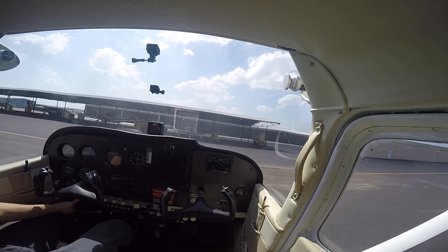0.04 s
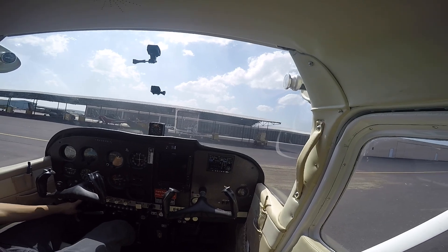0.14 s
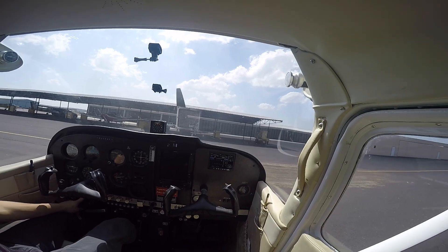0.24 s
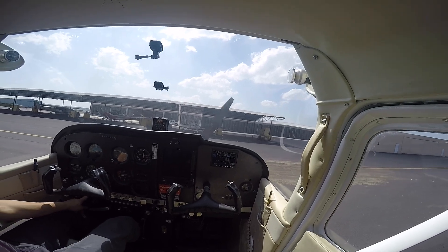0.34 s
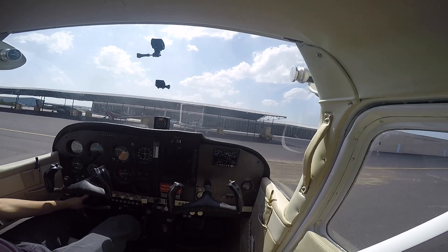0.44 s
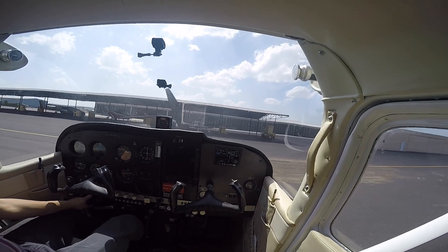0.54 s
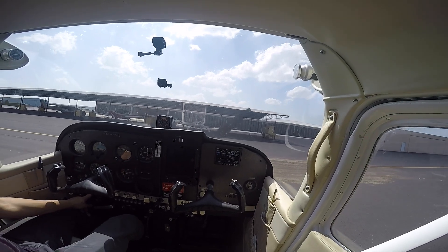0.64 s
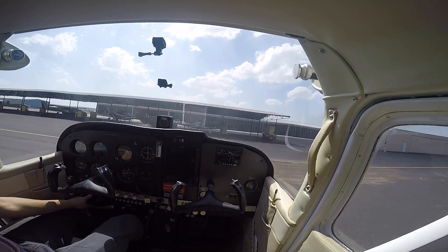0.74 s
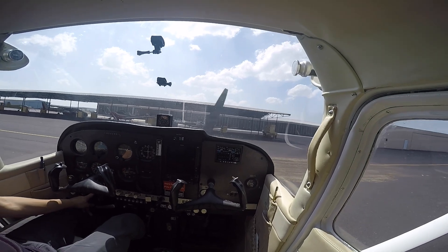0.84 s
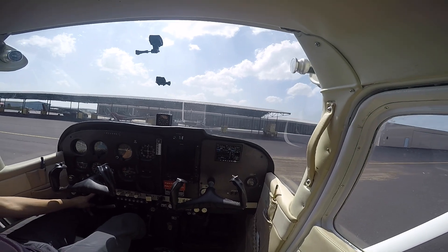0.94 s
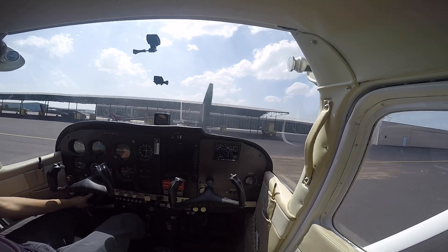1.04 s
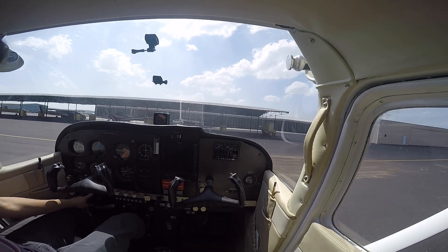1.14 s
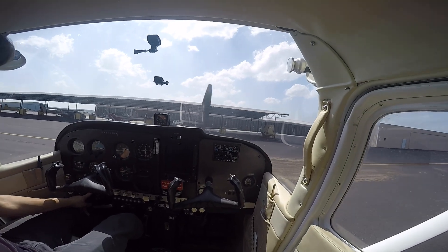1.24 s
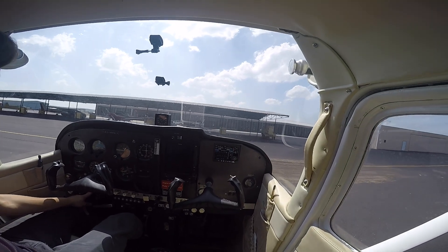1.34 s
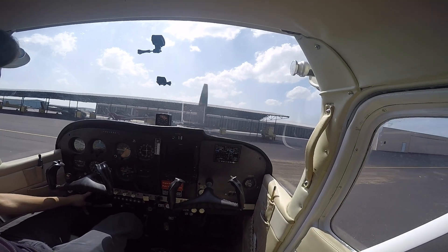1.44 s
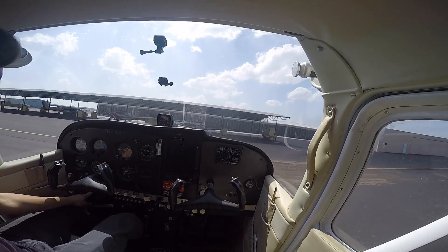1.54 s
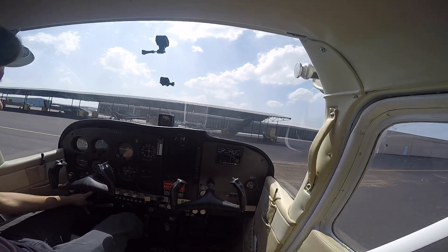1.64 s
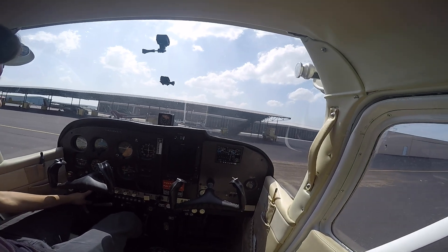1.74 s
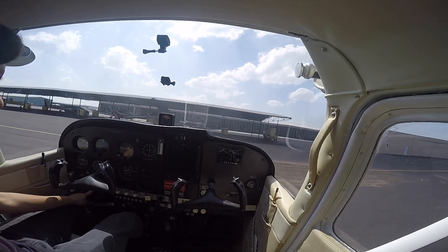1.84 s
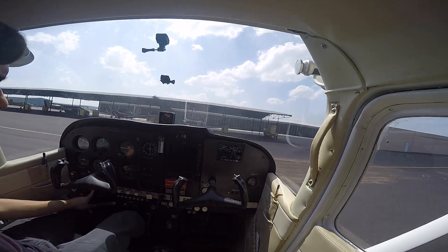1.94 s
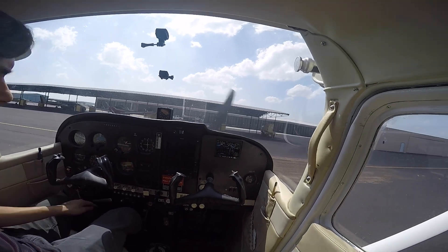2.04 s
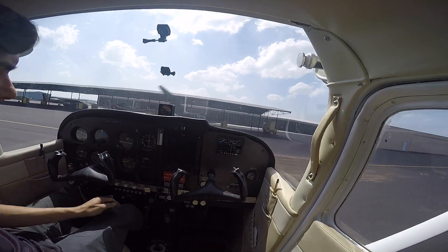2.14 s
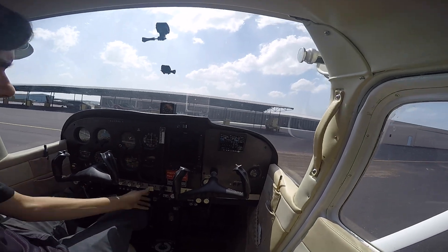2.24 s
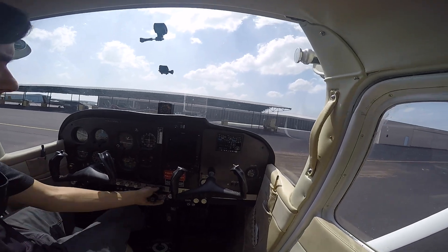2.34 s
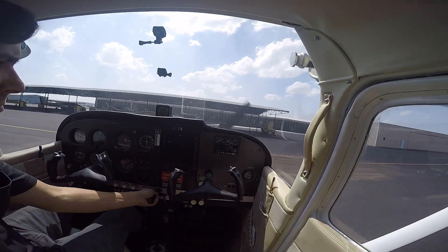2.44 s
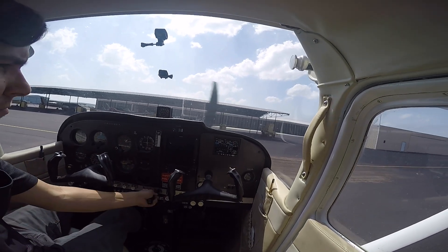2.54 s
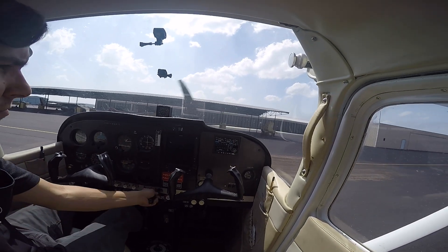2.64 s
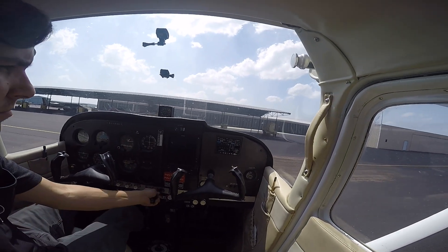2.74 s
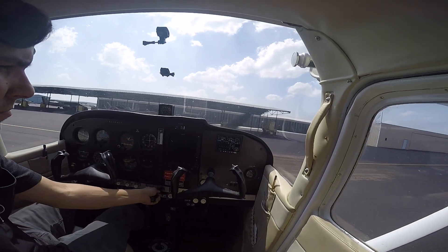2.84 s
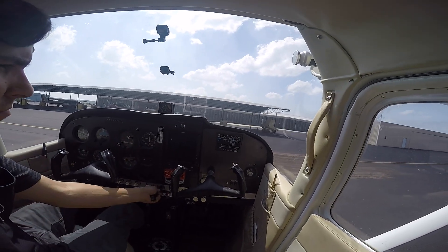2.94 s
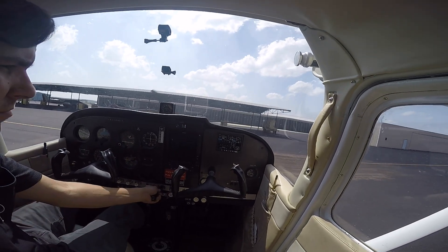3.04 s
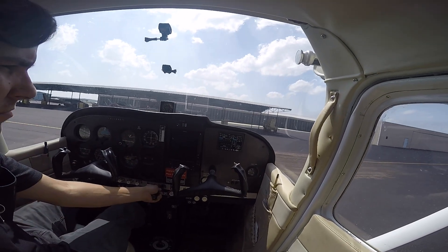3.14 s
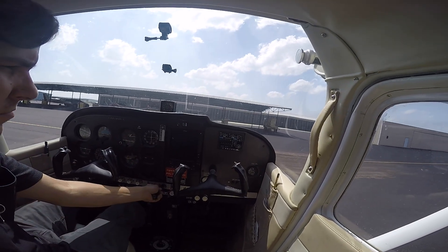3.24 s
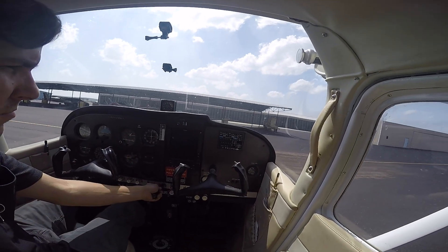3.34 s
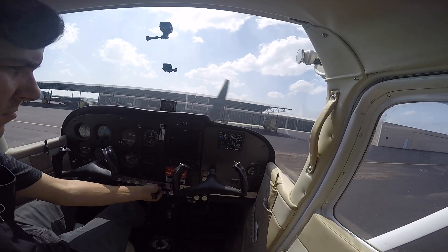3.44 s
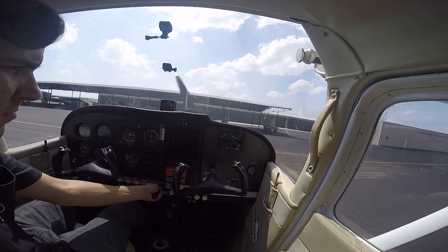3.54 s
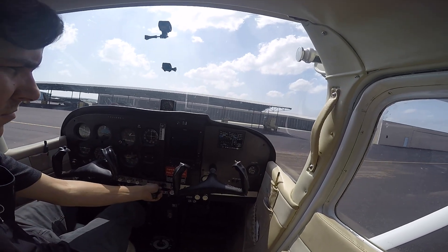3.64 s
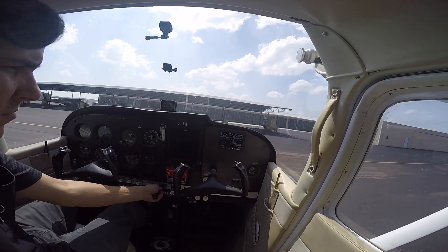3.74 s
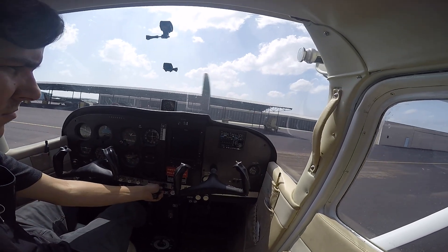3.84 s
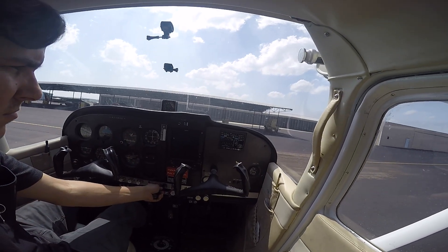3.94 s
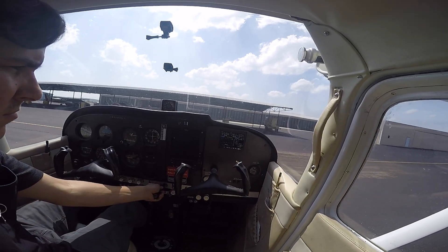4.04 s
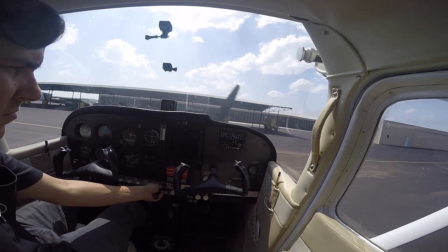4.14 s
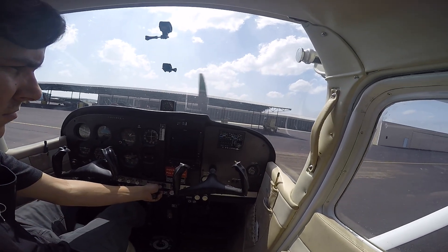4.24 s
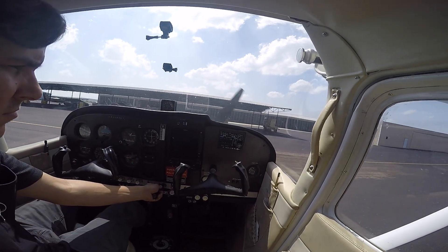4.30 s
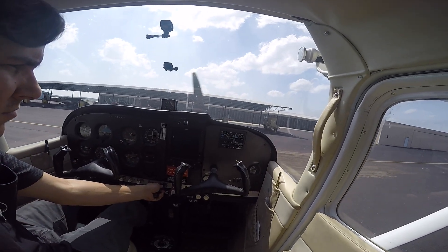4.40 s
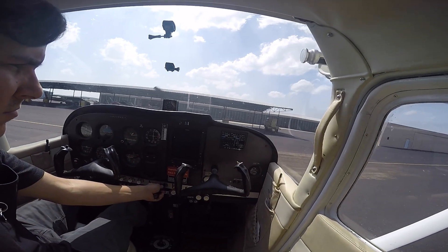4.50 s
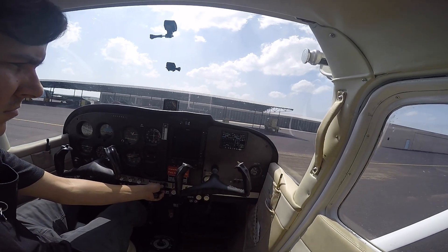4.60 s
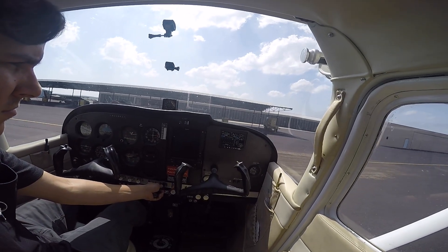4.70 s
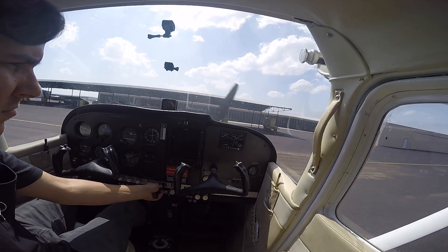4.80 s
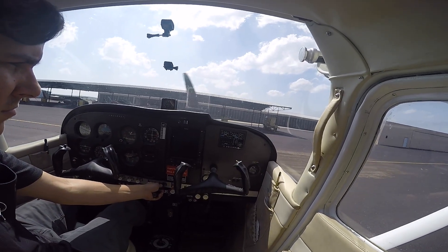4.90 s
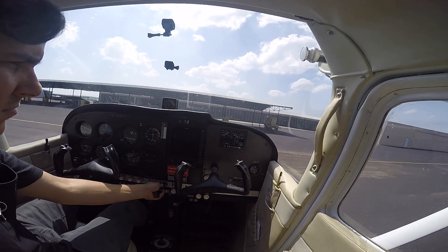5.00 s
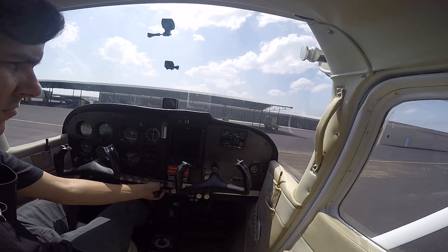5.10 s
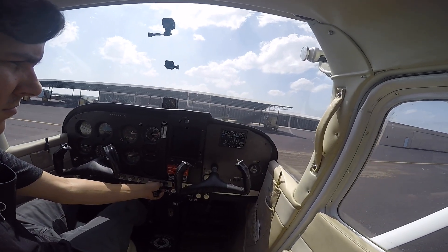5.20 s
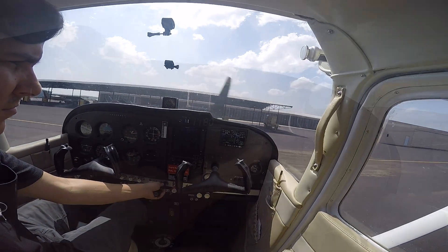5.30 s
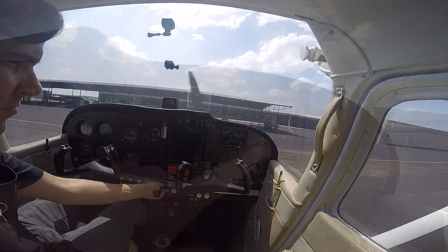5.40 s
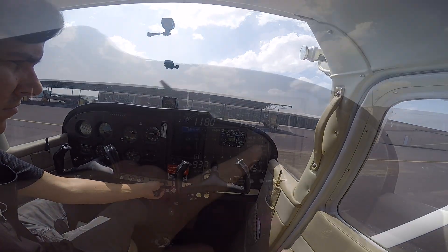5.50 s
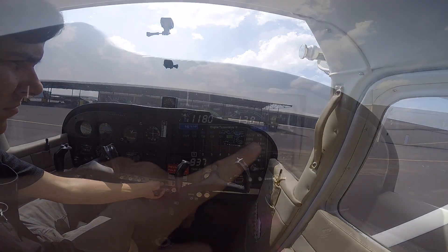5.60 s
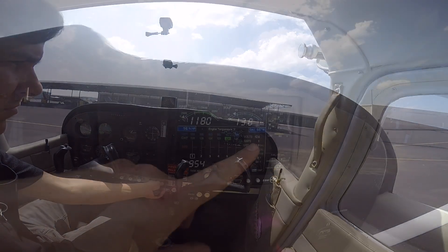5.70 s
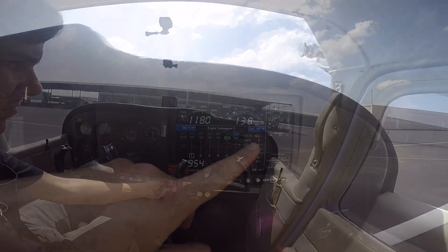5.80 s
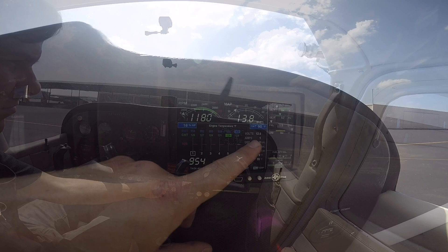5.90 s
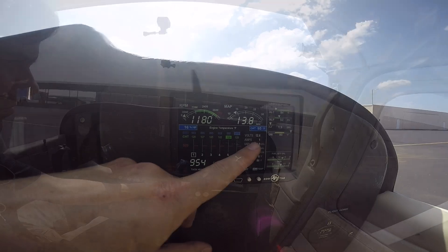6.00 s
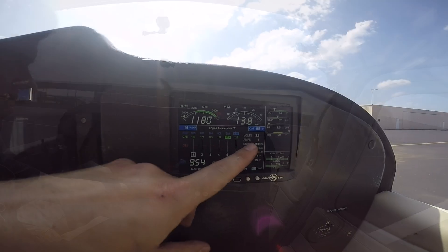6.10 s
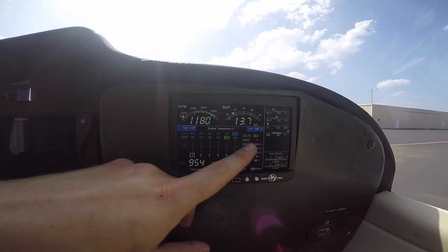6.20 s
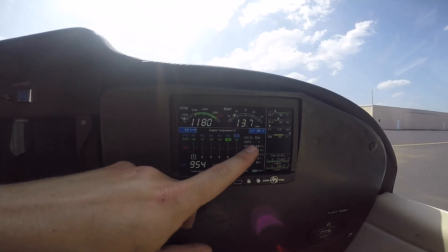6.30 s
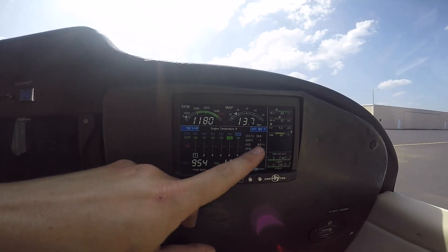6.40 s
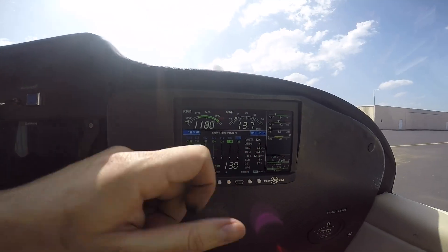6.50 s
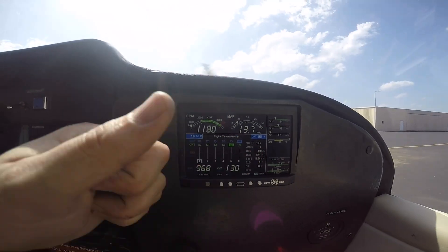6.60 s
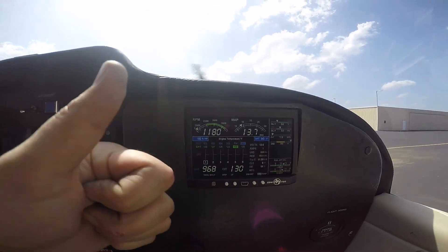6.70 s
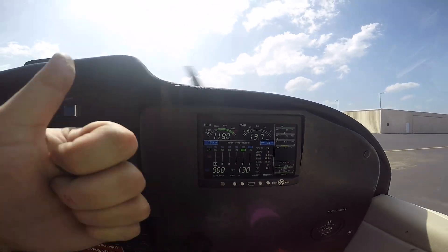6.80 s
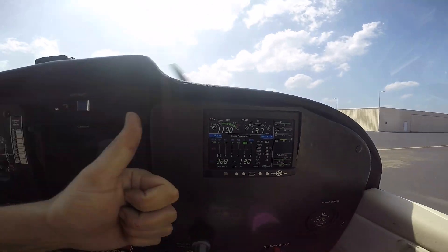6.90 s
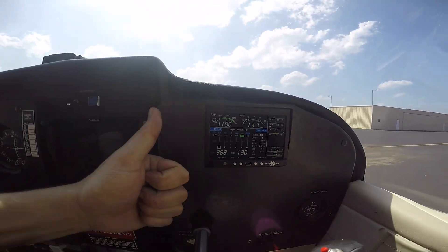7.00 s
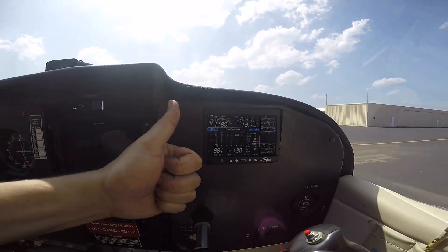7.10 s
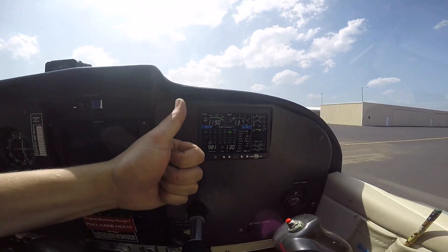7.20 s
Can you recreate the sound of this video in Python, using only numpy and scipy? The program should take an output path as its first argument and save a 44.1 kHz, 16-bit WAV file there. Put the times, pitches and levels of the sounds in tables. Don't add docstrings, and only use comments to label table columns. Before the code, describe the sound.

Inside a small aircraft cabin, small ticks and a gear clunk come first, then a run of hard, rattling compression knocks with short air hisses. After a brief gap the engine fires in sharp blasts, catches with a deep boom and races, then drops to a lumpy, puffing idle with jingling metal. Finally it crossfades to a smoother, quicker warm idle, close to the microphone.

```python
import sys
import numpy as np
from scipy import signal
from scipy.fft import rfft, irfft, next_fast_len
from scipy.io import wavfile
from scipy.ndimage import uniform_filter1d, map_coordinates

SR = 44100
rng = np.random.default_rng(int(sys.argv[2]) if len(sys.argv) > 2 else 0)


def gain_from_decibels(decibels):
    exponent = np.asarray(decibels, float) / 20
    return 10 ** exponent


def unload_wav(signal):
    wavfile.write(
        sys.argv[1],
        SR,
        np.round(np.clip(np.atleast_2d(signal).T, -1, 1) * 32767).astype(np.int16),
    )


N = 319801
T = np.arange(N) / SR

# t/s, rate/(turns per s)
SPEED = [(1.8906, 12.11), (2.0, 18.64), (2.35, 21.58), (2.7, 20.75), (3.0, 16.87), (3.2, 13.79),
         (3.77, 12.95), (3.9, 11.17), (4.02, 13.45), (4.5, 13.37), (6.0, 13.82)]
# t/s, puff
# peak level/dB, thump level/dB
BURN = [(1.89, -16.5, -0.5), (1.97, -23.5, -17), (2.15, -25, -18.5), (2.33, -26.5, -12.5),
        (2.66, -25, -13.5), (2.85, -37.5, -14.5), (3.08, -41, -13.5), (3.25, -31, -16.5),
        (3.36, -22, -16.5), (4.3, -24.5, -17.5), (5.2, -22.5, -15.5), (5.5, -26, -17.5), (5.61, -27.5, -30),
        (5.7, -29, -18), (5.98, -40.5, -26)]
# t/s, level re trend/dB
ODD_BURNS = [(2.17, -1.5), (2.55, 0.5), (2.6, -1), (2.64, 1), (2.955, 0), (3.14, 11.5), (4.13, 4),
             (4.43, -2.5), (4.87, 2), (5.03, -3.5), (5.25, -3.5), (5.68, -9.5)]
LEAN_TURNS, LEAN_DB = 3, -2.5
SCATTER_DB, THUMP_SCATTER_DB = 1.0, 1.5
FASTENERS_HZ = [3580, 3890, 5460, 5900, 6200, 6550, 6730, 7640]
# shaft multiple, level/dB
COLD_ORDERS = [(1, -9), (2, -3), (3, -10.5), (4, 0), (5, -9), (6, -1), (7, -19.5), (8, -0.5), (9, -8),
               (10, -0.5)]
# f/Hz, width/Hz, level/dB
CABIN = [(24.4, 18.2, -2.5), (52.4, 17, 1.5), (115, 46, -17.5), (197, 39, -37)]
# f/Hz, level/dB per Hz
RUMBLE = [(12, -56), (20, 9), (64, -6), (91, -34), (113, -26), (216, -27), (300, -51), (390, -77),
          (660, -120)]
# f/Hz, level/dB per Hz
PUFF = [(1180, -32), (2000, -30), (2180, -16), (3680, -9.5), (5390, -5), (11400, -7.5), (15200, -17),
        (15600, -18), (16000, -39)]

# t/s, panel peak level/dB, hiss re panel/dB, thump level/dB, length/s
ENGAGE = [
    (0.034, -51, 10, -34, 0.037),
    (0.106, -48, 7, -41, 0.0091),
    (0.199, -25.5, -35.5, -17, 0.028),
    (0.553, -27.5, -30, -38, 0.014),
    (1.355, -24, -58, -13.5, 0.019),
]
# t/s, panel peak level/dB, thump level/dB
SQUEEZES = [
    (0.376, -14.5, -22),
    (0.578, -13.5, -27),
    (0.744, -15.5, -30),
    (0.894, -15, -40),
    (1.036, -15, -22),
    (1.176, -14, -17.5),
    (1.445, -14.5, -13.5),
]
SQUEEZE_S, SQUEEZE_HISS_DB = 0.026, -16.5
REBOUND_AFTER_S, REBOUND_DB, REBOUND_THUMP_DB, REBOUND_S = 0.0602, -14.5, -2, 0.02
# t/s, blast peak level/dB, panel re blast/dB, thump level/dB, length/s
CATCH = [
    (1.597, -20.5, 0.5, -15, 0.023),
    (1.678, -11, -2.5, -24, 0.012),
    (1.749, -9.5, -0.5, -13.5, 0.013),
    (1.8044, -6.5, -5.5, -7, 0.0075),
    (1.844, -14, -7, -27, 0.032),
    (1.927, -19.5, -28, -27, 0.056),
]
# f/Hz, level/dB per Hz
SNEEZE = [(1180, 0.5), (2000, -5), (3140, -7), (4900, -7), (5730, -13.5), (7910, -6), (9830, -21),
          (14500, -24), (15500, -30), (16000, -50)]
# f/Hz, level/dB per Hz
BLAST = [(710, -28), (1200, -3), (1980, -1.5), (2140, -4.5), (3430, -5), (3940, -6.5), (8330, -3.5),
         (8980, -9), (15500, -15.5)]
# f/Hz, width/Hz, level/dB
PANEL = [(799, 40, 1.5), (1118, 28, 0.5), (1595, 4.9, -8), (1740, 48, -9.5), (2450, 31, -42),
         (2840, 40, -21)]
# f/Hz, level/dB per Hz
CLATTER = [(88, -45), (150, -24), (218, 4), (281, -7), (675, -5), (805, -7), (1280, -7.5), (3000, -19),
           (3900, -48), (6600, -120)]
# f/Hz, width/Hz, level/dB
FRAME = [(36.4, 18.3, 0.5), (54.6, 16, 1), (70.4, 4.4, -8), (120, 29, -18.5), (207, 69, -22)]
# t/s, level/dB
SHAKE = [(0.0, -56), (0.13, -37.5), (0.3, -40), (0.44, -35), (1.45, -35), (1.67, -26), (1.93, -25.5),
         (2.12, -32), (2.7, -30), (4.3, -33.5), (5.07, -30.5), (5.77, -35), (6.3, -32)]
RUMBLE_DB, RUMBLE_GROWS = 12, 0.57

WARM_SHAFT_HZ = 19.76
# t/s, level/dB
WARM = [
    (5.45, -31),
    (5.76, -33),
    (6.3, -28.5),
    (7.25, -28.5),
]
# shaft multiple, level/dB
WARM_ORDERS = [(1, -22), (2, -7), (3, 0), (4, -14), (5, -19), (6, -11), (7, -27), (8, -32), (10, -22),
               (12, -24)]
# f/Hz, width/Hz, level/dB
DASH = [(548, 35, 3), (771, 35, 0.5), (863, 57.5, 1), (1182, 71, -7), (1317, 15.4, -1.5), (1600, 36, -19)]
# f/Hz, level/dB per Hz
ROAR = [(13, -35), (22, 1), (68, -17.5), (135, -15), (163, -22), (438, -23), (530, -40), (661, -27),
        (846, -20.5), (1020, -30), (1310, -26.5), (2030, -37.5), (3820, -52), (8020, -48.5), (15500, -68)]

# t/s, f/Hz, level/dB, t60/s
ROCK = [
    (0.097, 20.8, -11.5, 3),
    (0.97, 18, -12.5, 0.4),
    (1.19, 15.5, -15, 3.5),
    (1.609, 14.9, -2.5, 0.46),
    (1.834, 19, -4, 0.44),
]
ROCK_RISE_S = 0.022
# t/s, level/dB
LEAK = [
    (1.8, -40),
    (1.842, -49),
    (1.916, -35),
    (2.232, -42),
    (2.582, -41),
    (2.644, -39.5),
    (2.77, -42),
    (2.85, -51),
]
# f/Hz, width/Hz, level/dB
LEAK_MODE = [(6860, 920, 0)]
# t/s, peak level/dB
CLICKS = [(0.0625, -23), (0.113, -17), (0.153, -27), (0.191, -33), (0.245, -41), (0.845, -22.5),
          (1.572, -21), (1.607, -11), (1.8445, -0.5), (2.7826, -8.5), (3.1108, -23), (3.1964, -30),
          (6.9424, -20)]
# f/Hz, level/dB per Hz
BUZZ = [(88, 5.5), (150, 1.5), (162, -8.5), (218, -6), (326, -8.5), (414, -6), (581, -10), (795, -10.5),
        (878, -8), (1090, -10.5), (1930, -17.5), (2190, -23.5), (3000, -24), (3900, -29), (6600, -120)]
# f/Hz, level/dB per Hz
AIR = [(1180, -3), (2000, 0.5), (2340, -4), (3200, -1), (3580, -2), (6820, 0), (14500, -14), (15600, -20),
       (16000, -43)]
LINGER_DB, LINGER_S = -34.5, 0.14
HISS_FLOOR_DB, HISS_DB, HISS_GROWS = -65.5, -40, 0.49
TOP_HZ = 15550


def unit(x):
    return x / np.sqrt(np.mean(x ** 2) + 1e-20)


def curves(rows):
    s, *cols = np.transpose(rows)
    return [np.interp(T, s, c) for c in cols]


def fade_in(start_s, length_s):
    return np.clip((T - start_s) / length_s, 0, 1)


def fade_out(end_s, length_s):
    return np.clip((end_s - T) / length_s, 0, 1)


def wobble(rate_hz):
    coarse = T[::32]
    knots = rng.standard_normal(int(N * rate_hz / SR) + 4)
    return np.interp(T, coarse, map_coordinates(knots, [coarse * rate_hz]))


def filtered(x, response):
    m = next_fast_len(N + SR // 2)
    return irfft(rfft(x, m) * response(np.fft.rfftfreq(m, 1 / SR)), m)[:N]


def shaped(points):
    f, db = np.transpose(points)
    return lambda hz: gain_from_decibels(np.interp(np.log(hz + 1), np.log(f + 1), db))


def modes(rows):
    def response(f):
        total = 0
        for k, (centre, width, db) in enumerate(rows):
            damping = 1j * f * width
            total = total + (-1) ** k * gain_from_decibels(db) * damping / (centre * centre - f * f + damping)
        return total
    return response


def noise(response, patchy_db):
    z = signal.stft(rng.standard_normal(N), nperseg=256)[2]
    field = uniform_filter1d(rng.standard_normal(z.shape), 4, 0)
    field = unit(uniform_filter1d(field, 8, 1))
    patchy = signal.istft(z * gain_from_decibels(patchy_db * field), nperseg=256)[1][:N]
    return unit(filtered(patchy, response))


def blows(s, gain):
    at = np.round(np.asarray(s) * SR).astype(int)
    return np.bincount(at[at < N], np.asarray(gain)[at < N], N)


def burst(length, rise, tail):
    t = np.arange(SR // 5) / SR
    return (1 - np.exp(-t / rise)) * np.exp(-np.maximum(t - abs(length), 0) / tail)


def cabin(pushes):
    ring = irfft(modes(CABIN)(np.fft.rfftfreq(SR, 1 / SR)))[:SR // 2]
    ring = np.convolve(ring, np.hanning(SR // 150))
    return signal.oaconvolve(pushes, ring / np.abs(ring).max())[:N]


def firings():
    hz, = curves(SPEED)
    turns = np.cumsum(hz * (T >= SPEED[0][0])) / SR
    s = np.interp(np.arange(63), turns + T / N, T)
    s[0] = SPEED[0][0]
    when, puff_db, thump_db = np.transpose(BURN)
    chance = rng.standard_normal((len(s), 3))
    lean = np.arange(len(s)) % LEAN_TURNS == 2
    puff_db = np.interp(s, when, puff_db) + LEAN_DB * lean + SCATTER_DB * chance[:, 0]
    for at, db in ODD_BURNS:
        puff_db[np.argmin(np.abs(s - at))] += db
    thump_db = np.interp(s, when, thump_db) + THUMP_SCATTER_DB * chance[:, 1]
    return s + .0015 * chance[:, 2], puff_db, thump_db, rng.choice(FASTENERS_HZ, len(s))


def cold_boom(firing):
    s, puff_db, thump_db, _ = firing
    padded = np.pad(s, 2, mode="reflect", reflect_type="odd")
    steady = uniform_filter1d(padded, size=3)[2:-2]
    slow = T[::8]
    turns = np.interp(slow, steady - .003, np.arange(len(s)))
    hz = 1 / np.gradient(steady)
    burn_db = uniform_filter1d(puff_db, size=5)
    tones = 0
    for k, db in COLD_ORDERS:
        bright = gain_from_decibels(0.038 * k * (burn_db + 32.5))
        lift = np.interp(slow, steady, modes(CABIN)(k * hz) * bright)
        tones = tones + gain_from_decibels(db + 2.56 * wobble(7.1)[::8]) * np.real(lift * np.exp(2j * np.pi * k * turns))
    tones = unit(signal.resample_poly(tones, 8, 1)[:N])
    rumble = gain_from_decibels(-4.5) * noise(shaped(RUMBLE), patchy_db=1)
    running = fade_in(1.88, 0.13) * fade_out(6.05, 0.16)
    return running * gain_from_decibels(np.interp(T, s, thump_db) - 1.0) * (tones + rumble)


def fastener_jingle(firing, chance):
    s, puff_db, _, ring_hz = firing
    chatter = .8 + .7 * wobble(600)
    t, jingle = T[:SR // 12], np.zeros(N)
    for when, db, hz, luck in zip(s, puff_db, ring_hz, chance):
        second_hz = hz * (np.where(hz < 5000, 1.55, .6) + .06 * luck[3])
        pair = np.sin(2 * np.pi * hz * t) + .6 * np.sin(2 * np.pi * second_hz * t)
        decay = gain_from_decibels(db - 12.5 + luck[4] - 60 * np.maximum(t - .012, 0) / .1)
        ring = decay * (1 - np.exp(-t / .002)) * pair * chatter[round(when * SR):][:len(t)]
        jingle[round((when - .001 + .002 * luck[5]) * SR):][:len(t)] += ring
    return jingle


def cold_idle(firing):
    s, puff_db, thump_db, _ = firing
    chance = rng.standard_normal((len(s), 6))
    half = s + np.gradient(s) * (.5 + 0.0099 * chance[:, 0])
    weak_db = uniform_filter1d(puff_db, size=3) - 18 + 2.2 * chance[:, 1]
    gates = blows(s - .004, gain_from_decibels(puff_db - 9.5)) + blows(half, gain_from_decibels(weak_db))
    gates = signal.oaconvolve(gates, burst(.015, rise=.002, tail=.01))[:N]
    jingle = fastener_jingle(firing, chance)
    uneven = cabin(blows(half, gain_from_decibels(thump_db - 4) * np.tanh(chance[:, 2])))
    buzz = gain_from_decibels(-1.5) * gates * noise(modes([(810, 70, -2), (1100, 220, 0)]), patchy_db=1.5)
    return gates * noise(shaped(PUFF), patchy_db=0.0) + jingle + buzz + uneven


def strokes(rows, air_colour):
    rattle, air, pushes = np.zeros(N), np.zeros(N), np.zeros(N)
    for s, panel_db, air_db, thump_db, length in rows:
        at = round((s - .004) * SR)
        knock = burst(length, rise=0.0022, tail=0.011)
        rattle[at:at + len(knock)] += gain_from_decibels(panel_db) * knock
        air[at:at + len(knock)] += gain_from_decibels(air_db) * burst(length + .008, rise=.005, tail=.02)
        pushes[at] = gain_from_decibels(thump_db + 2.5)
    teeth = rattle * rng.standard_normal(N)
    damped = [(hz, 1.36 * width, db) for hz, width, db in PANEL]
    sheet = unit(filtered(teeth, modes(damped))) + 0.62 * unit(filtered(teeth, shaped(CLATTER)))
    crackle = gain_from_decibels(0.8 * wobble(340)) * noise(shaped(air_colour), patchy_db=1.5)
    return sheet * np.sqrt(np.mean(rattle ** 2)) + air * crackle + cabin(pushes)


def cranking():
    tops = [(s, db, SQUEEZE_HISS_DB, thump_db, SQUEEZE_S) for s, db, thump_db in SQUEEZES]
    backs = [(s + REBOUND_AFTER_S, db + REBOUND_DB, SQUEEZE_HISS_DB, thump_db + REBOUND_THUMP_DB, REBOUND_S)
             for s, db, thump_db in SQUEEZES]
    drag = strokes([(s, db - 6.5, db + hiss_db - 0.5, thump_db, length)
                    for s, db, hiss_db, thump_db, length in ENGAGE + tops + backs], SNEEZE)
    fire = strokes([(s, db + panel_db - 10.5, db - 12, thump_db, length)
                    for s, db, panel_db, thump_db, length in CATCH], BLAST)
    shake_db = RUMBLE_DB - 36 + RUMBLE_GROWS * (curves(SHAKE)[0] + 36)
    rumble = gain_from_decibels(shake_db) * fade_out(2.2, 0.077) * noise(modes(FRAME), patchy_db=0.8)
    return drag + fire + rumble


def warm_idle():
    turns = WARM_SHAFT_HZ * T
    tones = 0
    for k, db in WARM_ORDERS:
        tones = tones + gain_from_decibels(db + 0.37 * wobble(4.6)) * np.sin(2 * np.pi * (k * turns + rng.random()))
    fire = np.flatnonzero(np.diff(np.floor(turns))) / SR
    knock = blows(fire, gain_from_decibels(0.22 * rng.standard_normal(len(fire))))
    pattern = rng.standard_normal(round(SR / WARM_SHAFT_HZ))
    knock = filtered(signal.fftconvolve(knock, pattern)[:N], modes(DASH))
    throb = 1 + 0.16 * np.cos(2 * np.pi * 2 * turns) + 0.029 * np.cos(2 * np.pi * turns)
    ring = throb * noise(modes(DASH), patchy_db=3.0)
    roar = throb * noise(shaped(ROAR), patchy_db=1.3)
    mix = gain_from_decibels(9.0) * unit(tones) + gain_from_decibels(-2.5) * unit(knock) + gain_from_decibels(-7.5) * ring + gain_from_decibels(1.0) * roar
    return gain_from_decibels(curves(WARM)[0] + 5.5) * fade_in(5.3, 0.57) * mix


def rocking():
    sway = np.zeros(N)
    ends = [row[0] for row in ROCK[1:]] + [2.1]
    for (s, hz, db, t60), end in zip(ROCK, ends):
        t = np.maximum(T - s, 0)
        held = (1 - np.exp(-t / ROCK_RISE_S)) * fade_out(end + ROCK_RISE_S, ROCK_RISE_S)
        sway += np.sqrt(2) * gain_from_decibels(db - 60 * t / t60) * held * np.sin(2 * np.pi * hz * t)
    return sway


def leak():
    gate = fade_in(1.8, 0.063) * fade_out(2.8, .03)
    return gain_from_decibels(curves(LEAK)[0] + 0.5) * gate * noise(modes(LEAK_MODE), patchy_db=2.5)


def clicks():
    s, db = np.transpose(CLICKS)
    gate = signal.fftconvolve(blows(s, gain_from_decibels(db - 6)), burst(.0006, rise=.0001, tail=.0014))[:N]
    colour = shaped([(300, -30), (1500, -2), (8000, 0), (15000, -8)])
    return filtered(gate * np.sign(rng.standard_normal(N)), colour)


def bed():
    s, db = np.transpose([row[:2] for row in SQUEEZES] + [(ENGAGE[1][0], -16)])
    linger = signal.oaconvolve(blows(s, gain_from_decibels(db + LINGER_DB)), np.exp(-T[:SR] / LINGER_S))[:N]
    burn_db = uniform_filter1d(curves(BURN)[0], size=SR // 8)
    flow = gain_from_decibels(HISS_DB + HISS_GROWS * (burn_db + 23)) * fade_in(1.55, 0.17)
    level = linger + flow + gain_from_decibels(HISS_FLOOR_DB) * fade_in(0, 0.04)
    hiss = level * gain_from_decibels(1.3 * wobble(25)) * noise(shaped(AIR), patchy_db=2.5)
    ring = filtered(gain_from_decibels(3 * wobble(70)) * rng.standard_normal(N), modes(PANEL[:1]))
    buzz = gain_from_decibels(0.8 * wobble(40)) * noise(shaped(BUZZ), patchy_db=1.5) + 0.54 * unit(ring)
    return fade_out(6.4, 0.31) * (gain_from_decibels(curves(SHAKE)[0] - 0.5) * buzz + hiss)


def scene():
    turns = firings()
    engine = cold_boom(turns) + cold_idle(turns) + cranking() + warm_idle()
    return (engine + rocking() + leak() + clicks() + bed())[None]


def top_cut(x):
    return signal.sosfilt(signal.butter(12, 16520, fs=SR, output="sos"), x)


def record(dry):
    soft = dry[0] / (1 + np.abs(dry[0] / .95) ** 6) ** (1 / 6)
    mix = filtered(soft, lambda hz: hz < TOP_HZ)[None]
    return top_cut(mix)


dry = scene()
out = record(dry)
unload_wav(out)
```